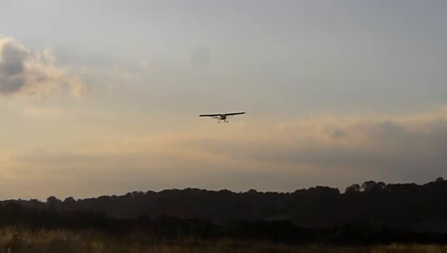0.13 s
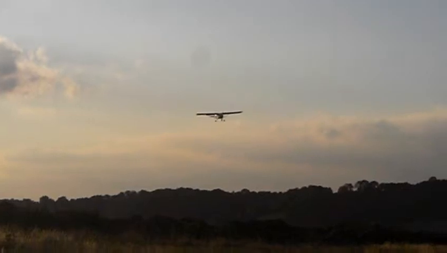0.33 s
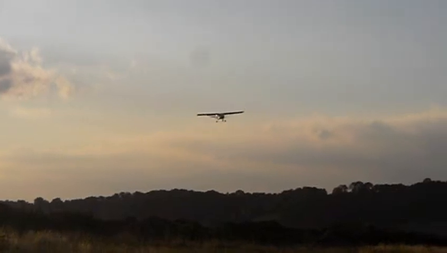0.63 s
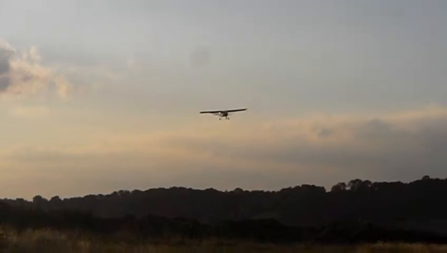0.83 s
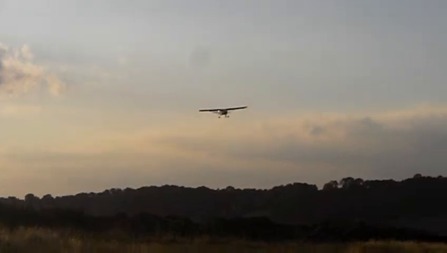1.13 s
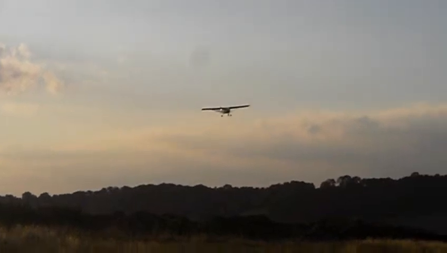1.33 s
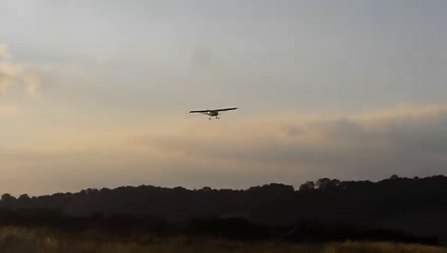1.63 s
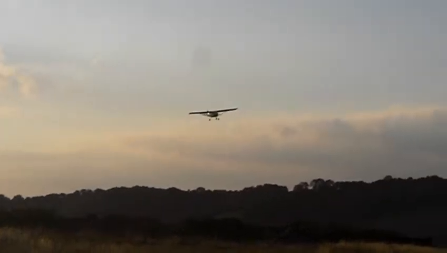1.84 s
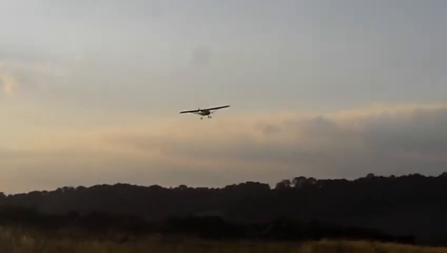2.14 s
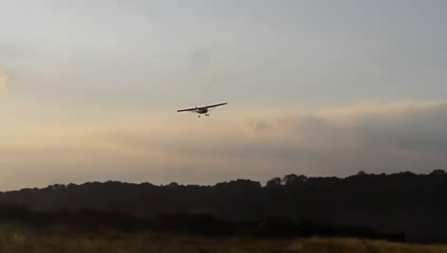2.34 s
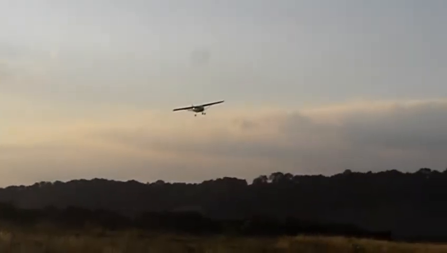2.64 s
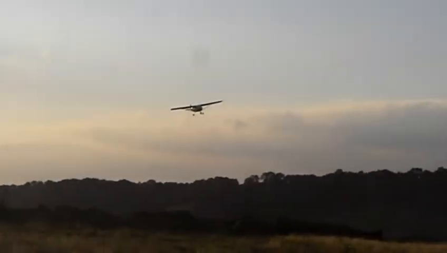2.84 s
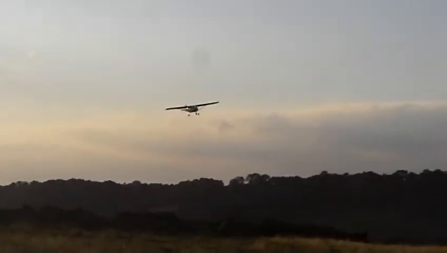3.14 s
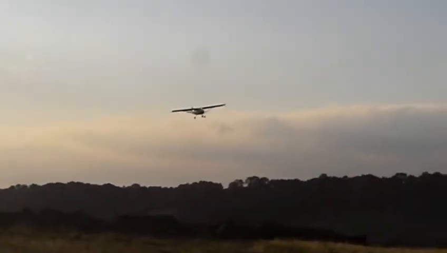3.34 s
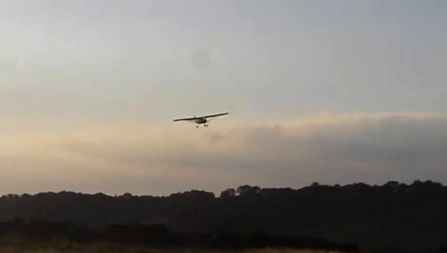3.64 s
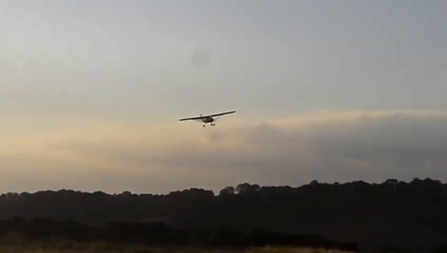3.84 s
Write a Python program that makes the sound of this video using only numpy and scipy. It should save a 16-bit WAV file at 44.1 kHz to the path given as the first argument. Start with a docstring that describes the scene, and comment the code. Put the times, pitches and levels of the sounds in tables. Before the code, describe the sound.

After a brief silence, a light aircraft's piston engine and propeller buzz steadily outdoors, growing to a peak before easing slightly, while low wind bumps hit the exposed microphone, hardest late on.

```python
"""After 0.17 s of silence a few-millisecond fade opens on hiss (shaped noise) and a light aircraft flying low
towards the listener over a field. Its four-stroke engine (cycle-locked noise puffs, ringing exhaust lines) swells
unevenly to about 2.8 s, chopped by the geared propeller, whose blade harmonics drone and hum, and swell in banking.
From 0.3 s gusts (bands of noise) and single eddies (short pressure swings) thump the microphone, hardest near
3.3 s; the engine sounds on to the end."""
import sys
import numpy as np
from scipy import signal
from scipy.fft import rfft, irfft
from scipy.io import wavfile
from scipy.ndimage import map_coordinates

SR = 44100
rng = np.random.default_rng(int(sys.argv[2]) if len(sys.argv) > 2 else 0)


def store_wav(level_fs):
    """Save 16-bit WAV to argv[1]."""
    pcm = np.round(np.clip(np.atleast_2d(level_fs), -1, 1) * 32767)
    wavfile.write(sys.argv[1], SR, pcm.T.astype(np.int16))


N = 176400
TIME_S = np.arange(N) / SR

# engine cycle rate as heard, before path jitter: (time [s], rate [cycles/s])
CYCLE_RATE = [(0, 33.1), (.5, 33.15), (.8, 33.3), (1.25, 33.33), (1.6, 33.29), (2.0, 33.41), (2.5, 33.33),
              (2.75, 33.22), (3.0, 33.15), (3.25, 33.3), (3.5, 33.51), (4, 33.52)]
BLADES_PER_CYCLE = 2.579
BLADE_CHOP_DEPTH, CRANK_SHAKE_DEPTH = .2, .35
PATH_JITTER_RMS_S, LINE_FADE_RMS_DB, FLUTTER_RMS_DB = .000025, 1.8, .8

# level of each engine range, before its trim: (time [s], level [dB])
LOWER_LEVEL = [(.2, -64), (.45, -51), (.9, -50), (1.4, -48.5), (1.9, -48), (2.57, -44), (3.15, -44),
               (3.48, -49.5), (4, -48.5)]
MIDDLE_LEVEL = [(0.2, -63), (0.28, -60), (0.64, -54.5), (0.94, -57.5), (1.2, -46), (2.01, -44), (2.04, -46),
                (2.7, -43.5), (3.5, -48.5), (4.0, -46.5)]
RING_LEVEL = [(0.2, -61.5), (0.45, -52.5), (0.72, -43), (1.17, -40), (1.38, -54), (1.87, -41.5),
              (2.15, -53.5), (2.69, -37.5), (3.28, -51), (3.36, -57), (3.39, -47.5), (3.95, -52),
              (4.0, -45)]
UPPER_LEVEL = [(0.2, -70), (0.36, -55), (0.8, -56.5), (0.94, -50), (1.56, -52), (1.64, -45.5),
               (2.24, -40.5), (2.81, -43), (2.97, -52), (4.0, -44.5)]
TREBLE_LEVEL = [(0.2, -62), (0.32, -53), (0.51, -50.5), (0.83, -53), (1.1, -48), (1.12, -52), (1.36, -50),
                (1.55, -45), (1.83, -54.5), (2.13, -41.5), (2.45, -45.5), (2.75, -38), (3.1, -51.5),
                (3.32, -45.5), (3.83, -54), (4.0, -48.5)]
TOP_LEVEL = [(0.2, -89.5), (0.26, -76), (0.55, -64), (0.92, -57.5), (1.06, -62.5), (1.77, -51.5),
             (1.82, -61), (2.25, -52.5), (2.83, -46), (3.03, -58), (3.81, -58), (4.0, -53.5)]
UPPER_TRIM_DB, TREBLE_TRIM_DB, TOP_TRIM_DB = 1, -1, -2

# spectral shape of the rattle in each range: (frequency [Hz], relative level [dB])
LOWER_COLOUR = [(300, -9.5), (500, 0.5), (720, -1), (860, 3.5), (1020, 7.5), (1200, -31)]
MIDDLE_COLOUR = [(900, -25.5), (1130, -5.5), (1280, -4), (1450, 1), (1650, -10), (2000, -40)]
RING_COLOUR = [(1200, -36.5), (1500, -17.5), (1630, 6.5), (1780, -9), (2100, -35)]
UPPER_COLOUR = [(1500, -33), (1800, -3), (1970, -0.5), (2200, -8), (2500, -17.5), (2850, -17.5),
                (3400, -24)]
TREBLE_COLOUR = [(2300, -35), (2850, -11), (3200, -0.5), (3400, -3.5), (3700, -11), (4200, -33)]
TOP_COLOUR = [(3200, -32), (3800, 9.5), (4200, 7.5), (4900, -3), (5700, -26.5), (9000, -33)]

# exhaust puffs in each range, over a steady 1: (place in cycle [0-1], height before scatter [ratio])
MIDDLE_PUFFS = [(.5, .7), (.7, .5)]  # also the lower range
RING_PUFFS = [(.48, 1.3), (.77, 1.2)]
UPPER_PUFFS = [(.2, .6), (.6, 1.1), (.7, 1.6)]
TREBLE_PUFFS = [(.2, .7), (.35, 1.4), (.8, 1.1)]
TOP_PUFFS = [(.18, 1.3), (.66, 1.7), (.76, .5)]
PUFF_WIDTH_CYCLES, PUFF_SCATTER_RMS_DB = .055, 2.2
# power share of fresh gas noise in the rattle
LOW_ROUGH, RING_ROUGH, UPPER_ROUGH, TREBLE_ROUGH = .35, .3, .4, .55

# engine orders standing out in the middle range: (multiple of cycle rate, relative level [dB])
MIDDLE_LINES = [(34, -8), (36, -14)]
# ringing exhaust lines: (multiple of cycle rate, relative level [dB])
EXHAUST_LINES = [(45, -8.5), (47, -14.5), (48, -14.5), (49, -2.5), (51, -6), (53, -5.5), (57, -16.5),
                 (59, -20.5)]
EXHAUST_TRIM_DB = -2.5

# propeller tones: (multiple of blade rate, relative level [dB])
DRONE_LINES = [(2, -6), (4, -4.5), (7, -3.5)]
HUM_LINES = [(3, -13.5), (5, -11.5), (6, -3)]
BUZZ_LINES = [(13, 0.5), (14, -9), (16, -13)]
BANKING_LINES = [(10, -4), (11, -15.5), (12, -7.5)]  # swell as the aircraft banks
BUZZ_TRIM_DB = -9.5
# propeller levels: (time [s], level [dB])
DRONE_LEVEL = [(.2, -62), (.7, -44.5), (1.2, -46), (1.7, -52.5), (2.4, -52.5), (2.9, -54), (4, -61)]
HUM_LEVEL = [(.2, -65), (.7, -53), (1.5, -42.5), (2.0, -46), (2.6, -53), (3.2, -51), (3.6, -47.5),
             (4, -52.5)]
BANKING_LEVEL = [(.2, -70), (1.0, -90), (1.9, -62), (2.3, -53.5), (2.8, -51.5), (3.15, -54), (3.5, -70),
                 (4, -56)]

# gust strength before lumps: (time [s], half length to 1/e [s], peak [dB])
GUSTS = [(0.309, 0.07, -28), (0.651, 0.076, -24.5), (0.806, 0.033, -35), (0.902, 0.017, -35),
         (1.318, 0.021, -25), (1.412, 0.067, -34.5), (1.588, 0.069, -36), (1.785, 0.083, -38.5),
         (2.088, 0.072, -28), (2.329, 0.047, -24.5), (2.438, 0.054, -29), (2.54, 0.016, -29.5),
         (2.605, 0.054, -38), (2.724, 0.053, -38), (3.295, 0.052, -21), (3.53, 0.015, -21.5),
         (3.63, 0.022, -30), (3.819, 0.057, -31.5), (3.9, 0.012, -28), (3.975, 0.029, -34.5)]
LUMP_RATE_HZ, LUMPS_DB = 35, 2.5
BREEZE_DB, BREEZE_SWING_RMS_DB = -48, 2.5
# port turbulence: (band centre [Hz], level re reference gust [dB], power of gust force followed)
TURBULENCE = [(26.7, -15, 0.56), (42.5, -11, 0.6), (68, -6, 0.67), (101, -5.5, 0.9), (148, -4, 1.04),
              (221, -8.5, 1.156), (340, -10, 1.32), (483, -20.5, 3.2)]
GUST_REFERENCE_DB = -25
# single eddies, before the port filter: (time [s], envelope peak [dB], frequency [Hz])
THUMPS = [(.276, -17, 380), (.2935, -15, 200), (.328, -16, 150), (.376, -22, 400), (.387, -12, 200),
          (.589, -17, 170), (.621, -15, 280), (.646, -14, 300), (.662, -12, 220), (.692, -15, 110),
          (.729, -14, 120), (1.3185, -11, 190), (1.387, -19, 110), (1.409, -20, 150), (1.529, -21, 160),
          (2.1765, -8, 110), (2.18, -12, 340), (2.341, -11, 190), (2.422, -13, 140), (2.464, -20, 230),
          (2.638, -18, 160), (2.659, -19, 170), (3.274, -10, 220), (3.292, -13, 140), (3.312, -7, 160),
          (3.328, -6, 220), (3.532, -13, 450), (3.54, -11, 260), (3.624, -15, 130), (3.797, -16, 115),
          (3.818, -21, 300)]
THUMP_WIDTH_CYCLES = .33
PORT_CUT_HZ = 696

# spectral shape of the hiss: (frequency [Hz], relative level [dB])
HISS_COLOUR = [(200, -0.5), (600, -6), (2500, 15.5), (5500, 2.5), (8500, -1), (10300, 3), (12500, 1),
               (14500, -3.5), (15700, -4)]
# hiss level: (time [s], level [dB])
HISS_LEVEL = [(.17, -64), (.34, -57), (.6, -52.5), (1.8, -52), (2.6, -50), (3.2, -52), (4, -52)]
OPENS_S, FADE_IN_S, CUTOFF_HZ = 0.1717, 0.0046, 15750


def engine(cycle):
    """Rattle in ranges that swell and fade on their own, plus clean engine orders and exhaust ringing."""
    lower = level_gain(LOWER_LEVEL) * rattle(cycle, LOWER_COLOUR, MIDDLE_PUFFS, LOW_ROUGH)
    middle_rattle = rattle(cycle, MIDDLE_COLOUR, MIDDLE_PUFFS, LOW_ROUGH)
    middle = level_gain(MIDDLE_LEVEL) * (middle_rattle + tones(cycle, MIDDLE_LINES))
    upper = level_gain(UPPER_LEVEL, UPPER_TRIM_DB) * rattle(cycle, UPPER_COLOUR, UPPER_PUFFS, UPPER_ROUGH)
    treble_rattle = rattle(cycle, TREBLE_COLOUR, TREBLE_PUFFS, TREBLE_ROUGH)
    treble = level_gain(TREBLE_LEVEL, TREBLE_TRIM_DB) * treble_rattle
    top = level_gain(TOP_LEVEL, TOP_TRIM_DB) * rattle(cycle, TOP_COLOUR, TOP_PUFFS, TREBLE_ROUGH)
    ring_rattle = rattle(cycle, RING_COLOUR, RING_PUFFS, RING_ROUGH)
    ring_lines = from_db(EXHAUST_TRIM_DB) * tones(cycle, EXHAUST_LINES)
    exhaust = level_gain(RING_LEVEL) * (ring_rattle + ring_lines)
    return lower + middle + upper + treble + top + exhaust


def rattle(cycle, colour, puffs, rough, points_per_cycle=1320):
    """Clatter repeating each cycle, mixed with fresh gas noise, under the puffs."""
    waveform = rng.standard_normal(points_per_cycle)
    repeating = map_coordinates(waveform, [cycle % 1 * points_per_cycle], order=3, mode="grid-wrap")
    source = np.sqrt(1 - rough) * repeating + np.sqrt(rough) * rng.standard_normal(N)
    return coloured(source * firings(cycle, puffs), colour) * from_db(FLUTTER_RMS_DB * drift(15))


def firings(cycle, puffs):
    """Unequal gas puffs in each engine cycle, chopped by the passing blades."""
    bursts = 0
    for place, height in puffs:
        offset = (cycle - place + .5) % 1 - .5  # signed distance in cycles
        bursts = bursts + height * np.exp(-(offset / PUFF_WIDTH_CYCLES) ** 2)
    scattered = bursts * from_db(PUFF_SCATTER_RMS_DB * drift(25))
    chop = 1 + BLADE_CHOP_DEPTH * np.cos(2 * np.pi * BLADES_PER_CYCLE * cycle)
    return (1 + scattered) * chop


def propeller(cycle):
    """Blade-rate harmonics (drone, hum, buzz, banking tones), shaken at each turn of the crank."""
    blade = BLADES_PER_CYCLE * cycle
    drone = level_gain(DRONE_LEVEL) * tones(blade, DRONE_LINES)
    hum = level_gain(HUM_LEVEL) * tones(blade, HUM_LINES)
    buzz = level_gain(MIDDLE_LEVEL, BUZZ_TRIM_DB) * tones(blade, BUZZ_LINES)
    banking = level_gain(BANKING_LEVEL) * tones(blade, BANKING_LINES)
    shake = 1 + CRANK_SHAKE_DEPTH * np.cos(2 * np.pi * 2 * cycle)  # two crank turns per cycle
    return (drone + hum + buzz + banking) * shake


def tones(turns, lines):
    """Harmonics of a rotation, each fading slowly on its own."""
    out = 0
    for multiple, db in lines:
        gain = np.sqrt(2) * from_db(db + LINE_FADE_RMS_DB * drift(1.77))
        out = out + gain * np.cos(2 * np.pi * (multiple * turns + rng.random()))
    return out


def buffeting():
    """Wind and eddies at the microphone, low-passed by its port."""
    port = signal.butter(4, PORT_CUT_HZ, fs=SR, output="sos")
    return signal.sosfilt(port, wind() + thumps())


def wind():
    """Turbulence in noise bands: the stronger the gust over the breeze, the higher it reaches."""
    gust_power = 0
    for centre_s, half_s, db in GUSTS:
        gust_power = gust_power + from_db(db) ** 2 * np.exp(-2 * ((TIME_S - centre_s) / half_s) ** 2)
    lumpy_power = gust_power * from_db(LUMPS_DB * np.clip(drift(LUMP_RATE_HZ), -2, 1)) ** 2
    breeze = from_db(BREEZE_DB + BREEZE_SWING_RMS_DB * drift(3.8))
    force = np.sqrt(lumpy_power + breeze ** 2) / from_db(GUST_REFERENCE_DB)
    out = 0
    for hz, db, power in TURBULENCE:
        band = signal.butter(2, [hz / 1.25, hz * 1.25], "band", fs=SR, output="sos")
        noise = rms_one(signal.sosfilt(band, rng.standard_normal(N)))
        out = out + from_db(GUST_REFERENCE_DB + db) * force ** power * noise
    return out


def thumps():
    """Each eddy is a pressure swing of a cycle or two that swells and dies."""
    out = 0
    for centre_s, db, hz in THUMPS:
        cycles = np.clip((TIME_S - centre_s) * hz, -20, 20)  # 0 at the envelope peak
        envelope = from_db(db) / np.cosh(cycles / THUMP_WIDTH_CYCLES)
        out = out + envelope * np.cos(2 * np.pi * (cycles + rng.random()))
    return out


def hiss():
    """Soft background of shaped noise."""
    return level_gain(HISS_LEVEL) * coloured(rng.standard_normal(N), HISS_COLOUR)


def from_db(db):
    """Decibels to gain."""
    return 10 ** (np.asarray(db) / 20)


def in_time(rows):
    """Interpolate a (time [s], value) curve at every sample."""
    return np.interp(TIME_S, *np.transpose(rows))


def level_gain(rows, trim_db=0):
    """Gain at every sample from a (time [s], level [dB]) curve plus a trim."""
    return from_db(in_time(rows) + trim_db)


def rms_one(x):
    """Scale to unit rms."""
    return x / np.sqrt(np.mean(x ** 2) + 1e-20)


def drift(rate_hz):
    """Unit-rms slow noise: two equal poles at rate_hz, run at SR / 40 and interpolated."""
    pole = np.exp(-80 * np.pi * rate_hz / SR)
    noise = rng.standard_normal(N // 40 + 2002)
    slow = signal.lfilter([1], [1, -2 * pole, pole * pole], noise)[2000:]  # drop the settling
    return np.interp(np.arange(N) / 40, np.arange(len(slow)), rms_one(slow))


def coloured(x, colour):
    """Filter x by (frequency [Hz], level [dB]) points, 20 dB/octave down outside them; unit rms."""
    hz, db = np.transpose(colour)
    octave = np.log2(np.maximum(np.arange(N // 2 + 1) * SR / N, 1))
    outside = np.abs(octave - np.clip(octave, np.log2(hz[0]), np.log2(hz[-1])))
    gain = from_db(np.interp(octave, np.log2(hz), db) - 20 * outside)
    return rms_one(irfft(rfft(x) * gain, N))


def scene():
    """Aircraft, wind on the microphone and hiss; path jitter shifts engine and propeller together."""
    rate = in_time(CYCLE_RATE)
    cycle = 1 + np.cumsum(rate) / SR + rate * PATH_JITTER_RMS_S * drift(15)
    background = buffeting() + hiss()
    return (engine(cycle) + propeller(cycle) + background)[None]


def record(dry):
    """The input opens after a moment of silence; a steep low-pass cuts the top."""
    opened = dry * np.clip((TIME_S - OPENS_S) / FADE_IN_S, 0, 1)
    low_pass = signal.ellip(12, .1, 90, CUTOFF_HZ, fs=SR, output="sos")
    return signal.sosfilt(low_pass, opened + 1e-18)  # offset avoids denormals


dry = scene()
out = record(dry)
store_wav(out)
```